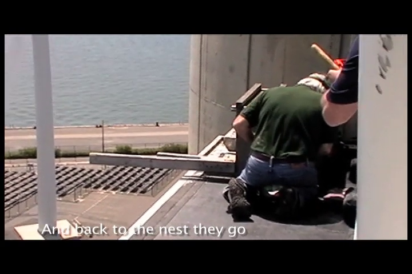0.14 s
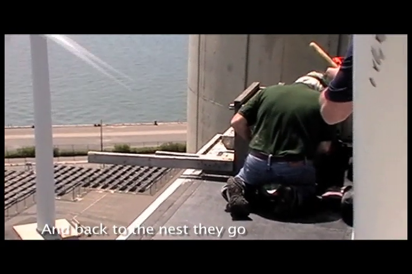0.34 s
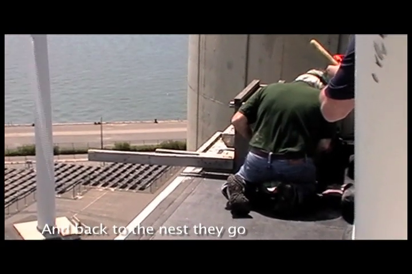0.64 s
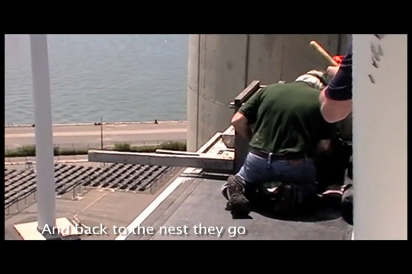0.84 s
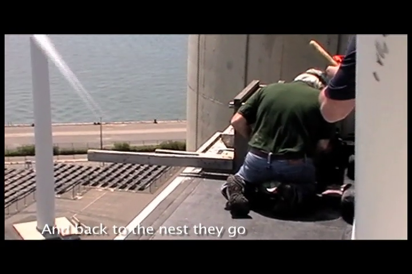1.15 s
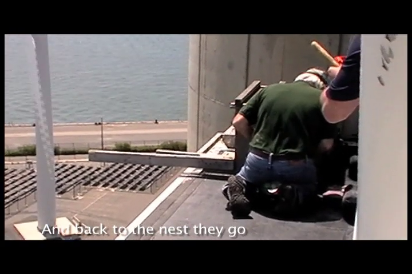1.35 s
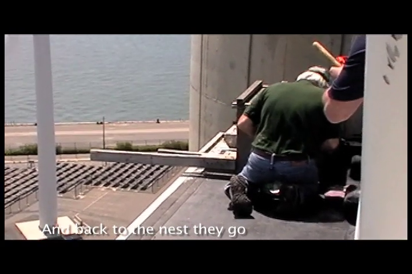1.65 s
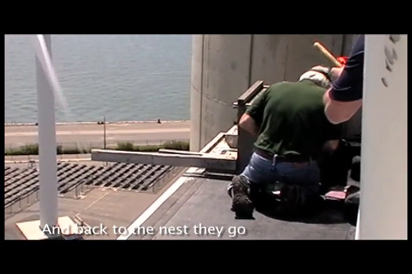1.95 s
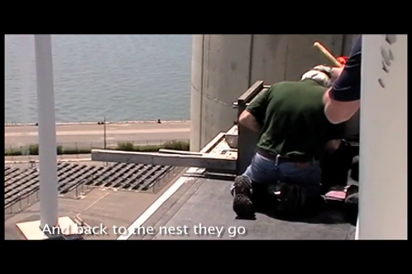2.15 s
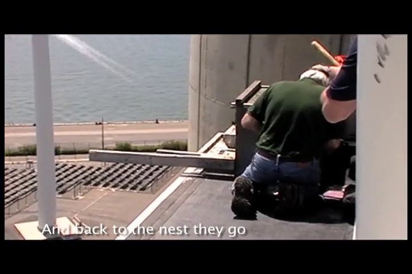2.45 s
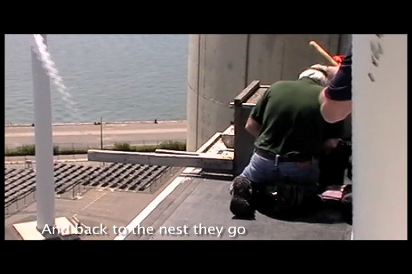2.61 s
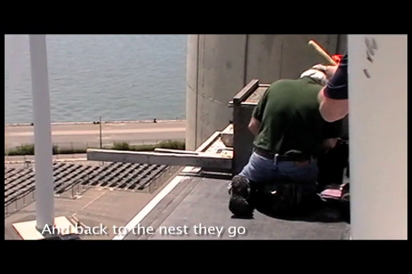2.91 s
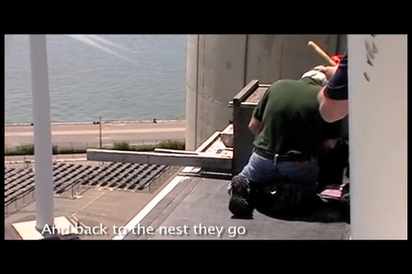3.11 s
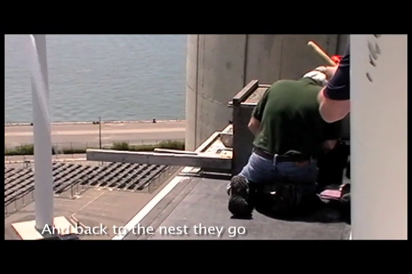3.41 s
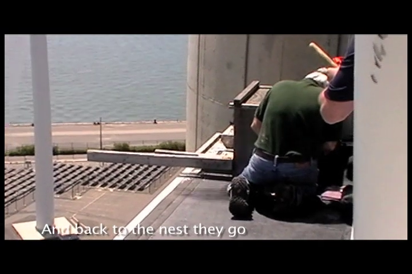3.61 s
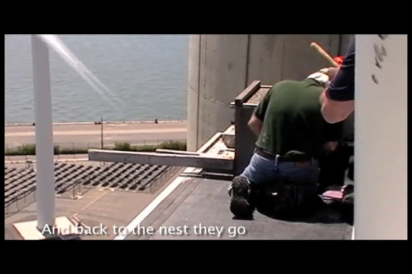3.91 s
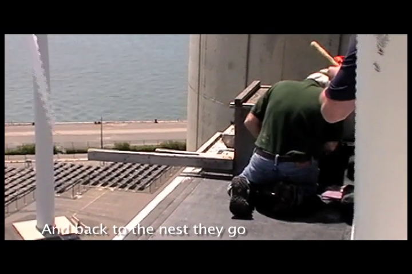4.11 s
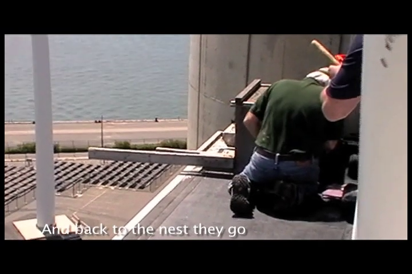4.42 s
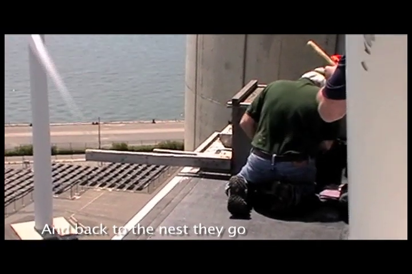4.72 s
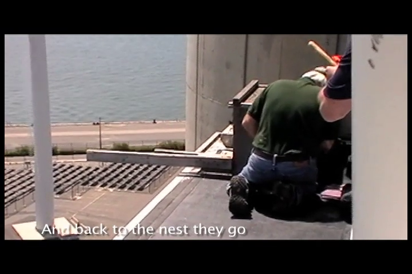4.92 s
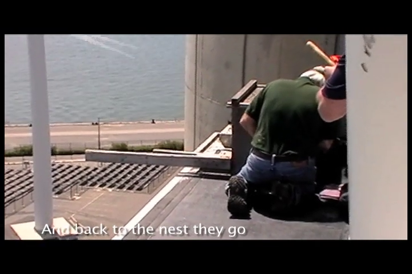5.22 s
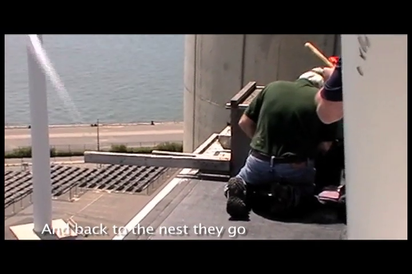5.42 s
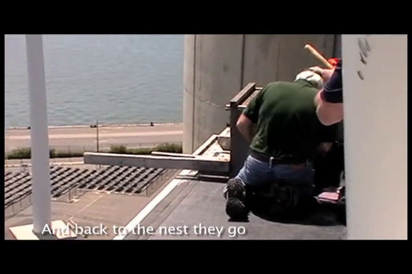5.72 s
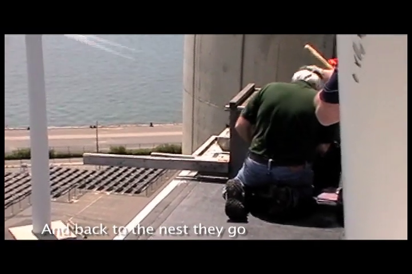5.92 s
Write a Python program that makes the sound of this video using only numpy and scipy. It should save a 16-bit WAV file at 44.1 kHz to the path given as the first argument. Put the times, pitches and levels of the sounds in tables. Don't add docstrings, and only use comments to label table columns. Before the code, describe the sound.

A falcon screams fast, harsh, grating notes without pause on a windy rooftop while its young chirp and whine and gusts thump the microphone.

```python
import sys
import numpy as np
from scipy import signal
from scipy.fft import rfft, irfft, next_fast_len
from scipy.io import wavfile
from scipy.ndimage import uniform_filter1d, map_coordinates

SR = 44100
rng = np.random.default_rng(int(sys.argv[2]) if len(sys.argv) > 2 else 0)


def pcm_store(signal):
    levels = np.round(np.clip(np.atleast_2d(signal), -1, 1) * 32767)
    wavfile.write(sys.argv[1], SR, levels.astype(np.int16).T)


def ratio(d):
    e = np.asarray(d, float) / 20
    return 10 ** e


N = 266948

# start_s, level_db
GUST_LEVELS = [(0.0, -22.5), (0.07, -18.5), (0.57, -17), (0.91, -20), (1.5, -15.5), (2.22, -17.5),
               (2.34, -17.5), (3.25, -17), (3.42, -20.5), (3.64, -16.5), (3.79, -15.5), (4.31, -17.5),
               (4.68, -18.5), (4.92, -19.5), (5.27, -22), (5.64, -19), (5.8, -20), (6.05, -22)]
# peak_s, level_db, sharpness_db
EDDIES = [(0.128, -8, -4.7), (0.423, -14, 5), (0.55, -9.5, 2), (0.769, -10.5, -5), (0.861, -22, -1),
          (0.939, -15, 5), (1.186, -15, -18), (1.534, -8.5, -1), (1.836, -14, 6), (1.939, -12.5, 5),
          (2.016, -16, -3.5), (2.324, -14.6, -0.5), (2.463, -13, 3), (2.591, -15.5, 7.5), (2.768, -16, 6),
          (2.969, -10.5, -13), (3.261, -12, -3), (3.366, -13, -11), (3.723, -13, 5), (3.881, -11, -1),
          (4.144, -9, -6), (4.267, -13.4, -4), (4.463, -9.5, -1), (4.557, -8.5, -0.9), (4.723, -9.5, 4),
          (4.882, -16, -0.2), (5.269, -16, 5.5), (5.457, -10, 1), (5.571, -12.9, 0.5), (5.675, -13.5, 6)]
# frequency_hz, level_db
ROLL_COLOUR = [(12, -74), (25, -28), (50, 18), (80, 18.5), (130, -48), (300, -120)]
# frequency_hz, level_db
RUMBLE_COLOUR = [(30, -61), (70, -2.5), (130, 0.5), (180, -1.5), (320, -8.5), (600, -20), (900, -38),
                 (1400, -92), (3000, -140)]
# frequency_hz, level_db
FLUTTER_COLOUR = [(60, 5.5), (200, 5.5), (350, 2), (700, -7.5), (1200, -18), (2000, -21), (4000, -76),
                  (8000, -120)]
# frequency_hz, level_db
AIR_COLOUR = [(530, -17.5), (900, -14), (1500, -22), (4850, -36.5), (8000, -49), (11300, -64), (15500, -72)]
# time_s, pitch_hz, level_db
PIPE_WHISTLE = [
    (0.83, 638, -39),
    (0.848, 606, -24),
    (0.896, 594, -29),
    (0.94, 686, -28),
]

# frequency_hz, level_db
YOUNG_THROAT = [(700, -3), (1150, -7), (1700, -12.5), (2500, 6.5), (3400, -8.5), (4400, -8), (6500, -9),
                (8500, -15), (11000, -23.5), (15500, -44)]
# start_s, end_s, level_db, first_pitch_hz, last_pitch_hz
YELP_CALLS = [
    (.277, .322, -37, 1167, 1100),
    (.556, .605, -33, 1305, 1257),
    (.92, .962, -35.5, 1400, 1434),
    (1.003, 1.06, -35, 1263, 1162),
    (1.465, 1.52, -34, 1373, 1402),
]
# start_s, end_s, level_db, first_pitch_hz, last_pitch_hz
CHIRP_CALLS = [
    (-.02, .062, -27.5, 1420, 1301),
    (1.348, 1.39, -22.5, 1510, 1460),
    (1.39, 1.445, -36, 1439, 1420),
    (1.775, 1.835, -22, 1430, 1399),
    (1.85, 1.915, -27, 1427, 1393),
    (4.12, 4.2, -30, 1188, 1163),
    (5.632, 5.685, -35, 617, 621.3),
    (5.87, 5.935, -25.5, 1152, 1150),
]
# start_s, end_s, level_db, first_pitch_hz, last_pitch_hz
WHINE_CALLS = [(2.1, 2.2, -31, 1358, 1307), (2.2, 2.29, -30, 1250, 1179), (2.5, 2.735, -31.5, 1367, 1152),
               (2.9, 3.085, -33, 1368, 1280), (3.085, 3.175, -31, 1229, 1196),
               (3.34, 3.45, -40, 1339, 1312), (3.45, 3.55, -32, 1300, 1200),
               (3.55, 3.685, -28.5, 1230, 1157), (3.89, 4.005, -39, 1272, 1240),
               (4.47, 4.58, -40, 1194, 1206), (4.68, 4.725, -38, 1070, 1070),
               (5.125, 5.238, -30, 1076, 1058), (5.24, 5.38, -27, 1082, 1134),
               (5.595, 5.635, -37, 1265, 1250), (5.785, 5.87, -27.5, 1221, 1201),
               (5.935, 5.99, -30, 1144, 1157)]
# start_s, end_s, level_db, first_pitch_hz, last_pitch_hz
PIPE_CALLS = [
    (4.01, 4.12, -30, 1236, 1182),
    (4.725, 4.815, -30, 1105, 1139),
]
# hoarseness 0-1, share the pitch starts low, shrillness_db, attack_s, swell_db, release_s
YELP_VOICE = (.55, -.09, 9.5, .007, -1.5, .02)
CHIRP_VOICE = (.45, .01, 1.6, .015, 1.47, .075)
WHINE_VOICE = (.58, .08, 1.48, .035, 1.54, .053)
PIPE_VOICE = (.22, .02, 1.5, .034, 1.5, .034)
EDGE_DB, SCOOP_S, GLIDE_BEND = 10.5, .02, 1.7

# centre_hz, width_hz, level_db
BEAK_MODES = [(2114, 196, 2), (2890, 272, -4.5), (3333, 78, -5), (3980, 152, -7.5), (4405, 102, -12.5),
              (5410, 690, -18), (6270, 356, -15.5), (8360, 490, -17.5), (10340, 970, -25),
              (13900, 1600, -58)]
# start_s, end_s, level_db, clarity 0-1,
# highest_pitch_hz
ADULT_NOTES = [(-.09, .07, -29.5, 0.1, 1100), (.1, .259, -21.5, 0.71, 1125), (.335, .493, -20, 0.83, 1115),
               (.57, .71, -21, 0.76, 1100), (.79, .945, -22, 0.71, 1110), (1.03, 1.17, -21.5, 0.66, 1115),
               (1.235, 1.378, -19, 0.84, 1130), (1.44, 1.59, -24.5, 0.57, 1090),
               (1.665, 1.796, -21.5, 0.63, 1110), (1.87, 2.015, -23, 0.75, 1100),
               (2.1, 2.24, -22, 0.69, 1100), (2.31, 2.455, -20.5, 0.8, 1095),
               (2.53, 2.675, -23, 0.46, 1100), (2.765, 2.91, -22, 0.65, 1095),
               (2.98, 3.129, -21.5, 0.61, 1097), (3.2, 3.35, -22, 0.58, 1090),
               (3.42, 3.566, -18.5, 0.52, 1084), (3.66, 3.79, -19.5, 0.62, 1085),
               (3.87, 4.032, -25, 0.44, 1084), (4.1, 4.244, -23.5, .5, 1088),
               (4.32, 4.474, -22, 0.57, 1088), (4.56, 4.701, -23, 0.61, 1088),
               (4.79, 4.931, -24, 0.58, 1092), (5.0, 5.145, -22, 0.56, 1087),
               (5.235, 5.384, -19, .55, 1085), (5.45, 5.606, -21, .55, 1080), (5.68, 5.826, -19, .5, 1088),
               (5.88, 6.032, -19.5, 0.57, 1094)]
# attack_s, start_under_peak_db, swell_db, hold_s, release_s, end_under_peak_db
NOTE_LOUDNESS = (0.02, 19.8, 11.3, 0.032, 0.029, 26.8)
TIRE_S, FRESH_BEAK_DB, TIRED_BEAK_DB = 3.1, 2.1, -.5
FRESH_LIMP, TIRED_LIMP, LIMP_FROM_S, LIMP_OVER_S = .22, .65, 2.3, 1.2


def unit(x):
    return x / np.sqrt(np.mean(x ** 2) + 1e-20)


def along(points, hz):
    f, v = np.transpose(points)
    return np.interp(np.log(hz + 1), np.log(f + 1), v)


def column(rows, index):
    rows = np.asarray(rows)
    return np.interp(np.arange(N) / SR, rows[:, 0], rows[:, index])


def envelope(start, end, db, attack, under_db, swell_db, hold, release, out_db):
    top = max(end - release - hold, start + attack)
    return [(start, db - under_db), (start + attack, db - swell_db), (top, db),
            (max(end - release, top), db), (end, db - out_db)]


def fading(calls, index):
    t, gain = np.arange(N) / SR, np.zeros(N)
    for rows in map(np.asarray, calls):
        span = slice(*np.searchsorted(t, rows[[0, -1], 0]))
        gain[span] += ratio(np.interp(t[span], rows[:, 0], rows[:, index]))
    return uniform_filter1d(gain, size=300)


def per_call(calls, values):
    call_number = np.searchsorted([row[0] for row in calls[1:]], np.arange(N) / SR)
    return np.asarray(values)[call_number]


def wobble(rate):
    knots = rng.standard_normal(int(N * rate / SR) + 4)
    return map_coordinates(knots, [np.arange(N) * rate / SR])


def filtered(x, response):
    m = next_fast_len(N + 4096)
    return irfft(rfft(x, m) * response(np.fft.rfftfreq(m, 1 / SR)), m)[..., :N]


def noise(spectrum, grain=1):
    return unit(filtered(grain * rng.standard_normal(N), lambda hz: ratio(along(spectrum, hz))))


def pressure():
    t = np.arange(0, N / SR, .001)
    peak_s, db, sharp_db = np.transpose(EDDIES)[..., None]
    swell_s = np.where(t < peak_s, .023, .024)
    eddies = ratio(2 * (db - 1)) * np.exp(-2 * np.abs(t - peak_s) / swell_s)
    gusts = ratio(2 * np.interp(t, *np.transpose(GUST_LEVELS)))
    strengths = []
    for pushes in (eddies, eddies * ratio(2 * sharp_db)):
        db_curve = 10 * np.log10(gusts + pushes.sum(axis=0))
        strengths.append(np.interp(np.arange(N) / SR, t, db_curve))
    return strengths


def pipe_whistle():
    turn = 2 * np.pi * np.cumsum(column(PIPE_WHISTLE, index=1)) / SR
    return fading([PIPE_WHISTLE], index=2) * 1.3 * np.sin(turn)


def wind():
    lumps = np.tanh(wobble(24.14) / 2) * 2
    push_db, sharp_db = pressure()
    flap_db = 1.45 * sharp_db
    roll = ratio(-27.0) * noise(ROLL_COLOUR, ratio(.62 * wobble(4.9)))
    rumble = ratio(-16.0) * noise(RUMBLE_COLOUR, ratio(push_db + .35 * lumps + 2.44 * wobble(70)))
    flutter = ratio(-23.5) * noise(FLUTTER_COLOUR, ratio(flap_db + 2.4 * lumps + 4.2 * wobble(60)))
    hiss = ratio(-36.5) * noise(AIR_COLOUR, ratio(2 * wobble(9)))
    return roll + rumble + flutter + pipe_whistle() + hiss


def wall(x, t60=.16):
    t = np.arange(SR // 4) / SR
    tail = rng.standard_normal(len(t)) * ratio(-60 * t / t60) * (t > .004)
    wet = signal.fftconvolve(x, tail / np.linalg.norm(tail))[:N]
    return filtered(wet, lambda hz: 1 / (1 + 1j * hz / 6000))


def buzz(pitch_hz, count, slope, limp=0):
    turn = 2 * np.pi * np.cumsum(pitch_hz) / SR
    pulses = sum(np.cos(k * turn) / max(k / 3, 1) ** slope for k in range(1, count + 1))
    return unit(pulses * (1 + limp * np.cos(turn / 2)) / np.sqrt(1 + limp ** 2 / 2))


def young():
    kinds = ((YELP_CALLS, YELP_VOICE), (CHIRP_CALLS, CHIRP_VOICE),
             (WHINE_CALLS, WHINE_VOICE), (PIPE_CALLS, PIPE_VOICE))
    calls = sorted((*row, *voice) for rows, voice in kinds for row in rows)
    columns = np.transpose(calls)[:8]
    start, end, _, first, last, hoarse, scoop, shrill_db = (per_call(calls, c) for c in columns)
    since = np.maximum(np.arange(N) / SR - start, 0)
    hoarse = np.clip(hoarse, 0, .95)

    glide = first + (last - first) * np.clip(since / (end - start), 0, 1) ** GLIDE_BEND
    glide = glide * (1 - scoop * np.exp(-since / SCOOP_S))
    pitch = glide * (1 + .033 * hoarse * wobble(260) + .02 * hoarse * wobble(35))

    steady = buzz(pitch, count=10, slope=.56) * ratio(4.7 * hoarse * wobble(190))
    rasp = rng.standard_normal(N) * ratio(3 * wobble(600))
    tone, air = [unit(filtered(x, lambda hz: ratio(along(YOUNG_THROAT, hz)))) for x in (steady, rasp)]
    voice = np.sqrt(1 - hoarse ** 2) * tone + hoarse * air

    shapes = [envelope(*c[:3], c[8], EDGE_DB, c[9], 0, c[10], EDGE_DB) for c in calls]
    effort = fading(shapes, index=1)
    shrill = ratio(shrill_db) * np.abs(effort / ratio(-24.5)) ** .5
    treble = filtered(voice, lambda hz: hz > 3200)
    return ratio(6) * effort * (voice + (shrill - 1) * treble)


def clicks(rate_hz, scatter, size_db):
    uneven_rate = rate_hz * np.exp(scatter * wobble(400))
    beat = np.diff(np.floor(np.cumsum(uneven_rate) / SR), prepend=0)
    return unit(beat * ratio(size_db * rng.standard_normal(N)) / np.sqrt(rate_hz))


def throat(opening):
    def response(hz):
        modes = 0
        for k, (open_hz, width, db) in enumerate(BEAK_MODES):
            centre = open_hz * (opening if open_hz < 3000 else 1)
            mode = 1j * hz * width / (centre * centre - hz * hz + 1j * hz * width)
            modes = modes + (-1) ** k * ratio(db) * mode
        return modes * (hz / (hz - 1500j)) ** 2
    return response


def adult():
    notes = ADULT_NOTES
    start, end, _, clarity, top_hz = (per_call(notes, c) for c in np.transpose(notes))
    t = np.arange(N) / SR
    fresh = np.exp(-end / TIRE_S)
    tired = np.clip((end - LIMP_FROM_S) / LIMP_OVER_S, 0, 1)
    limp = FRESH_LIMP + (TIRED_LIMP - FRESH_LIMP) * tired
    progress = np.clip((t - start) / (end - start), 0, 1)

    past_top = np.clip(t - end + .064, -.062, .07)
    arch = 1 - np.where(past_top > 0, 50 * (1 - limp), 34) * past_top ** 2
    locked = np.clip(clarity, 0, .95) * np.clip((past_top + .058) / .04, 0, 1)
    shake = (.003 + .014 * (1 - locked)) * wobble(150)
    pitch = uniform_filter1d(top_hz * arch, size=200) * (1 + shake)

    click_hz = 165 + 290 * np.clip(progress / .55, 0, 1) ** 1.5 + 90 * progress
    creak = clicks(click_hz, scatter=.045, size_db=1.6)
    breath = .55 * rng.standard_normal(N)
    steady = buzz(pitch, count=14, slope=.85, limp=limp) * ratio(2.5 * wobble(230))
    source = np.sqrt(locked) * steady * ratio(-8.5) + np.sqrt(1 - locked) * unit(creak + breath)

    opening = 2 * np.clip(progress / .62, 0, 1)
    voice = 0
    for k, shape in enumerate((.82, .92, 1)):
        share = np.clip(1 - np.abs(opening - k), 0, 1)
        voice = voice + np.sqrt(share) * filtered(source, throat(shape))
    voice = unit(voice)

    treble = filtered(voice, lambda hz: hz > 3600)
    chest = ratio(-13) * locked ** 2 * np.sin(2 * np.pi * np.cumsum(pitch) / SR)
    beak_db = TIRED_BEAK_DB + (FRESH_BEAK_DB - TIRED_BEAK_DB) * fresh
    brightness = ratio(beak_db - 11.3 * (1 - opening / 2))
    effort = fading([envelope(*note[:3], *NOTE_LOUDNESS) for note in notes], index=1)
    return ratio(1.5) * effort * (voice + chest + (brightness - 1) * treble)


def scene():
    birds = adult() + young()
    answer = ratio(-14) * wall(birds)
    mono = birds + answer + wind()
    leak = ratio(-55) * noise(RUMBLE_COLOUR) + ratio(-58) * noise(FLUTTER_COLOUR)
    return np.array([mono + leak, mono - leak])


def roll_off(x):
    return signal.sosfilt(signal.butter(12, 15690, fs=SR, output="sos"), x)


def record(dry):
    soft = dry / (1 + np.abs(dry / .98) ** 5) ** (1 / 5)
    mix = filtered(soft, lambda hz: hz < 15800)
    return roll_off(mix)


dry = scene()
out = record(dry)
pcm_store(out)
```